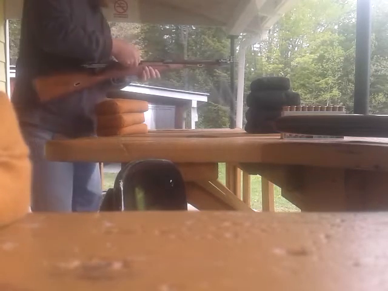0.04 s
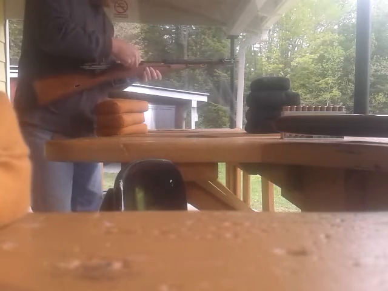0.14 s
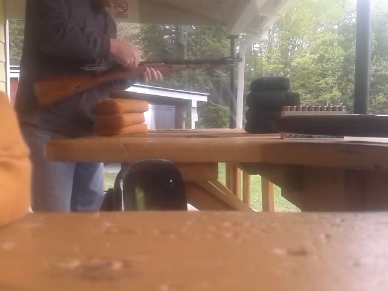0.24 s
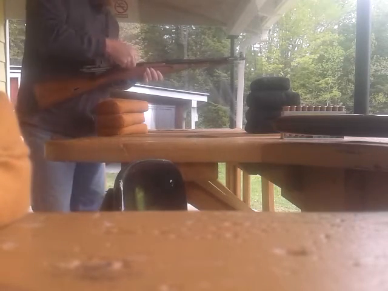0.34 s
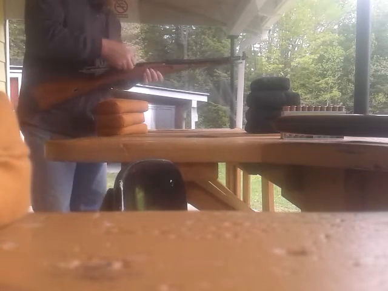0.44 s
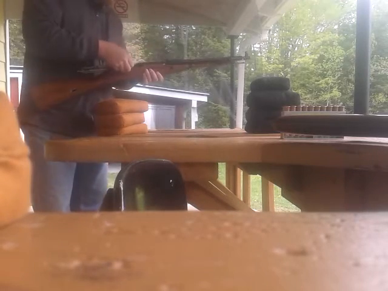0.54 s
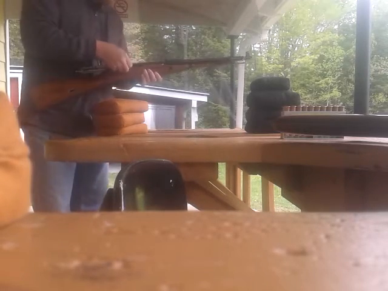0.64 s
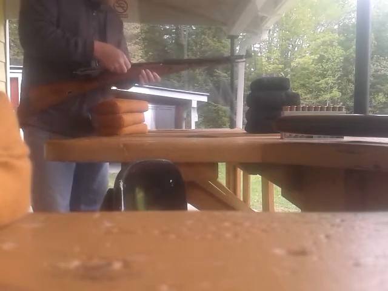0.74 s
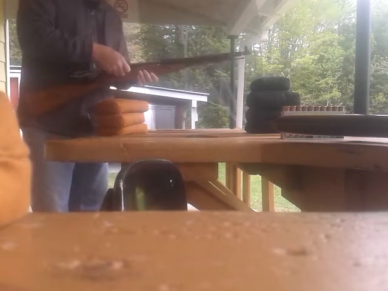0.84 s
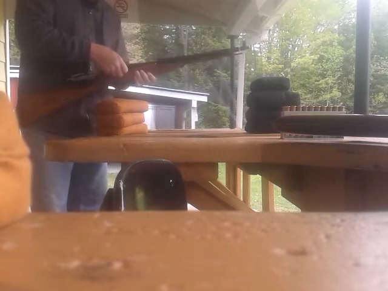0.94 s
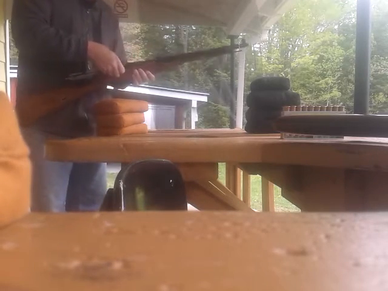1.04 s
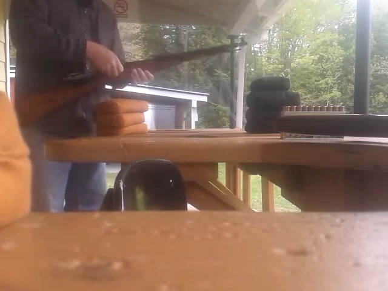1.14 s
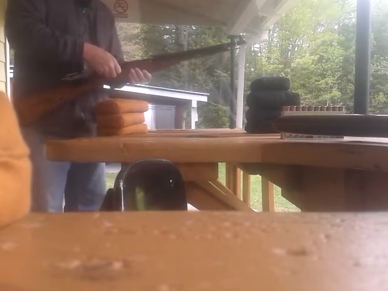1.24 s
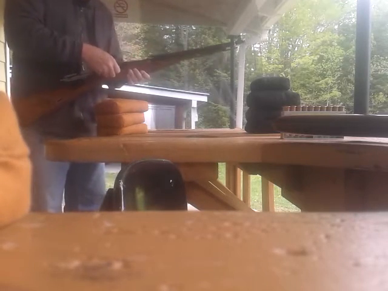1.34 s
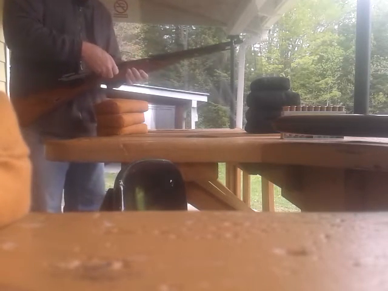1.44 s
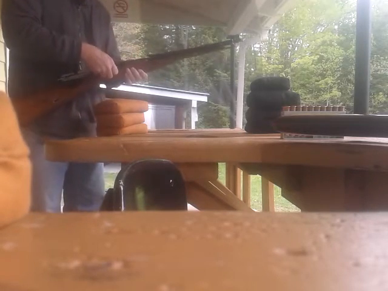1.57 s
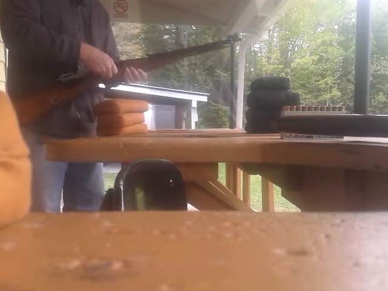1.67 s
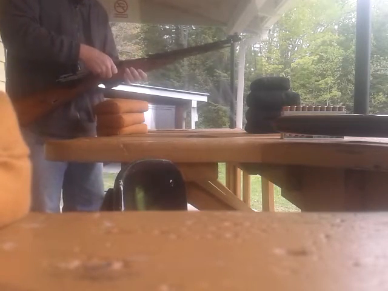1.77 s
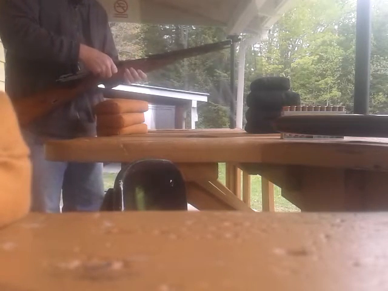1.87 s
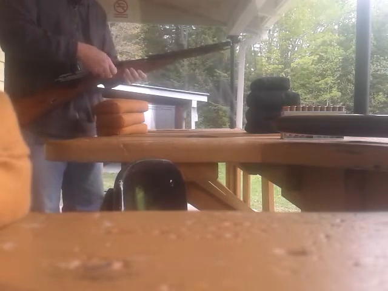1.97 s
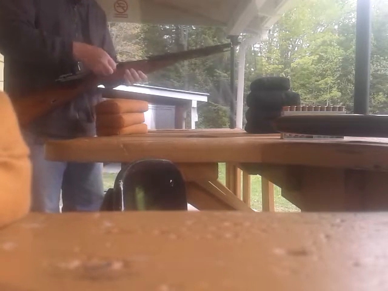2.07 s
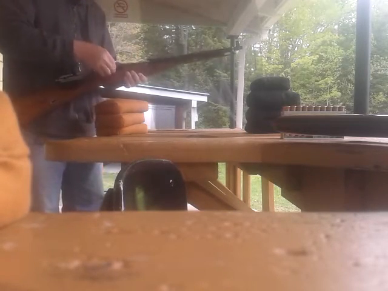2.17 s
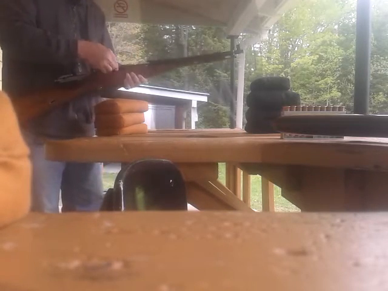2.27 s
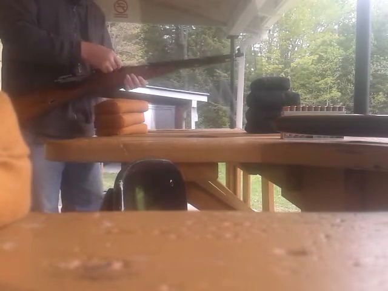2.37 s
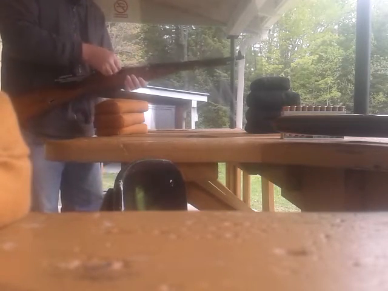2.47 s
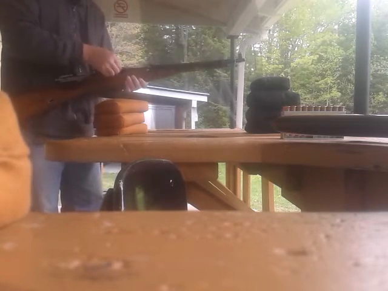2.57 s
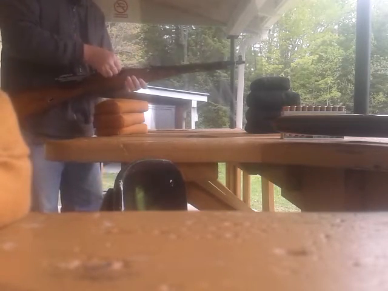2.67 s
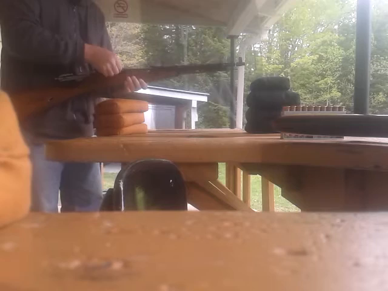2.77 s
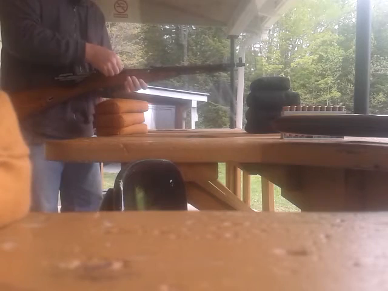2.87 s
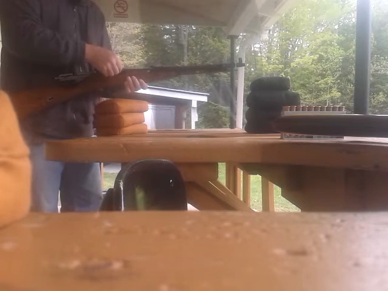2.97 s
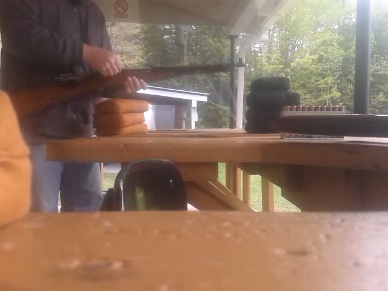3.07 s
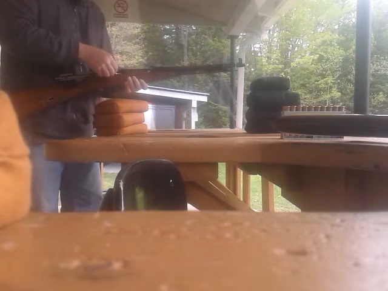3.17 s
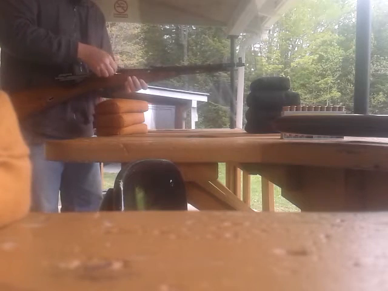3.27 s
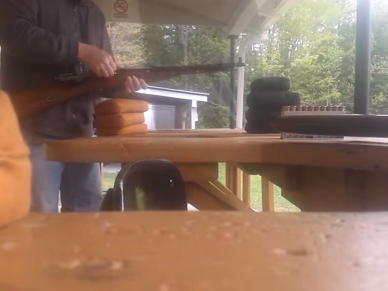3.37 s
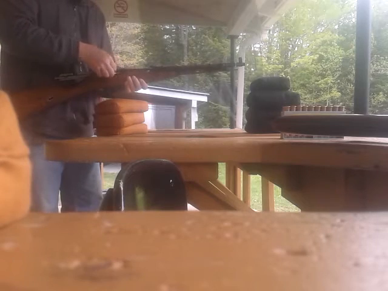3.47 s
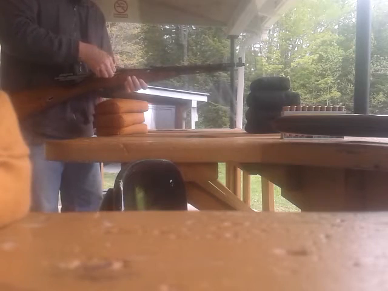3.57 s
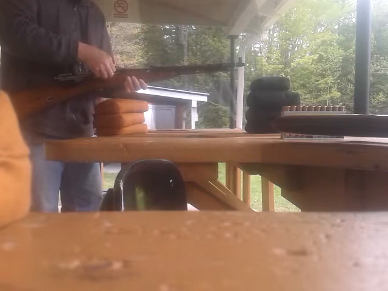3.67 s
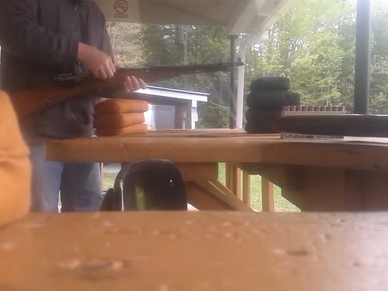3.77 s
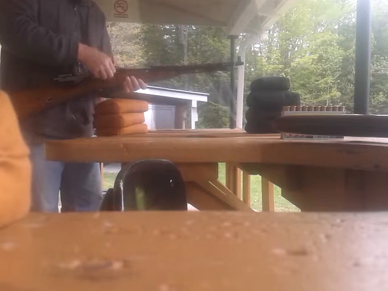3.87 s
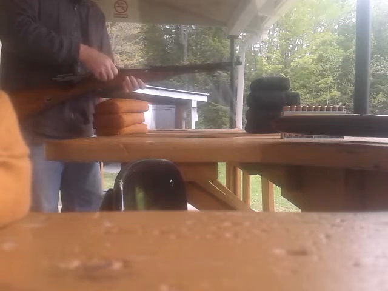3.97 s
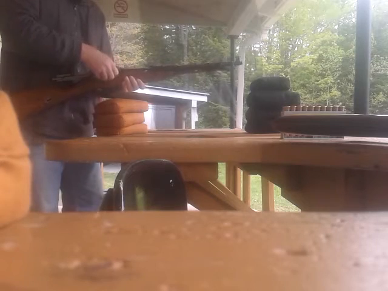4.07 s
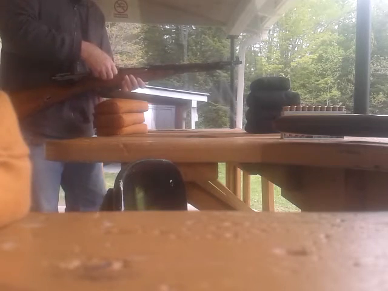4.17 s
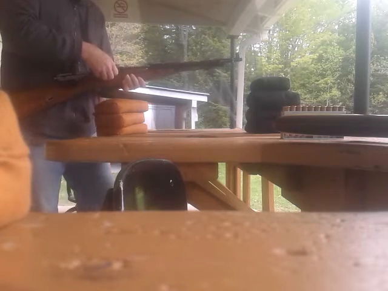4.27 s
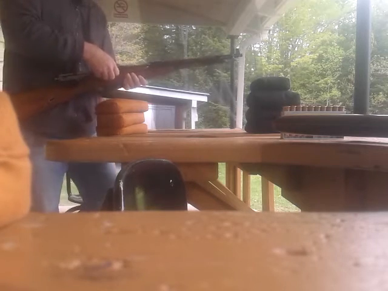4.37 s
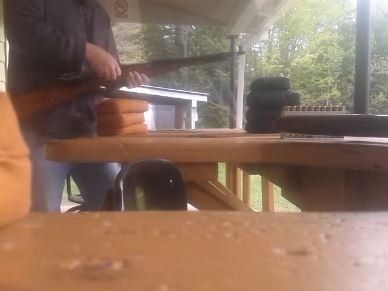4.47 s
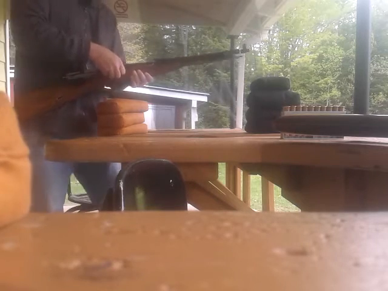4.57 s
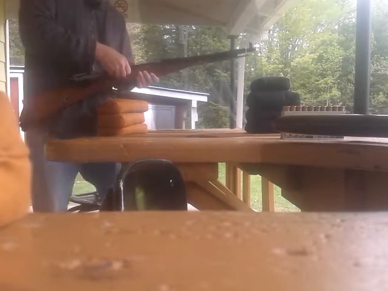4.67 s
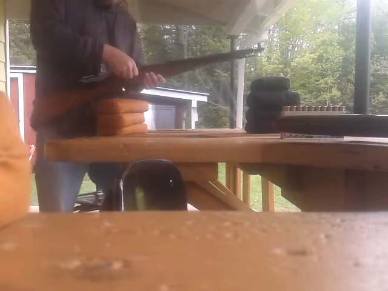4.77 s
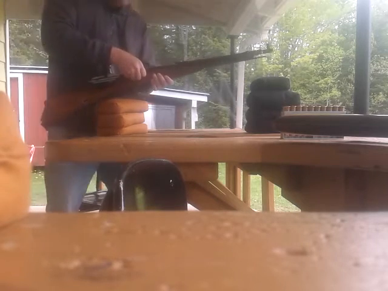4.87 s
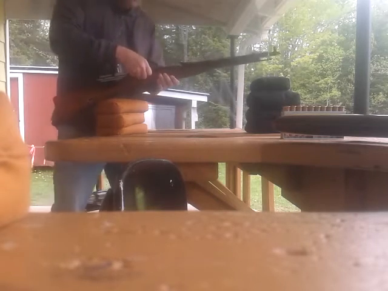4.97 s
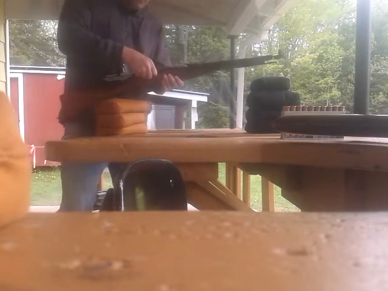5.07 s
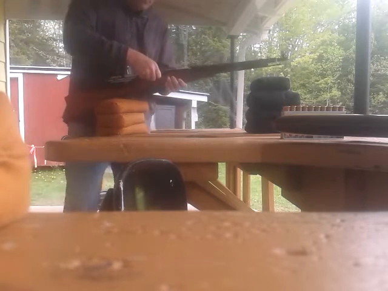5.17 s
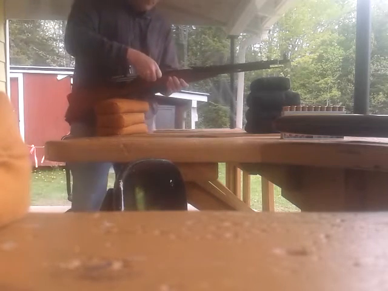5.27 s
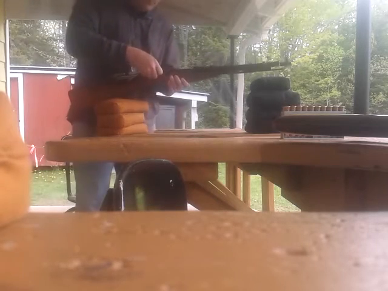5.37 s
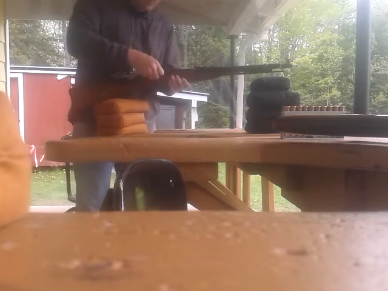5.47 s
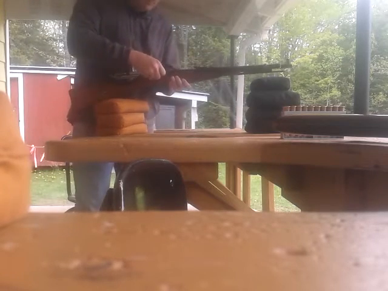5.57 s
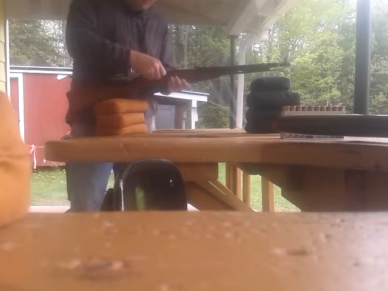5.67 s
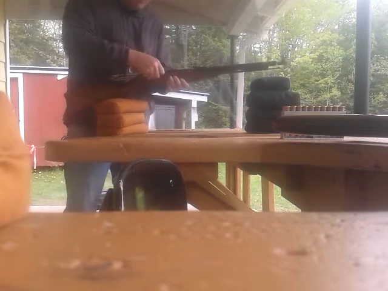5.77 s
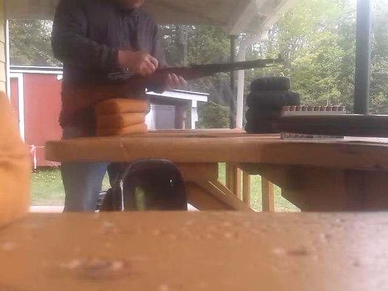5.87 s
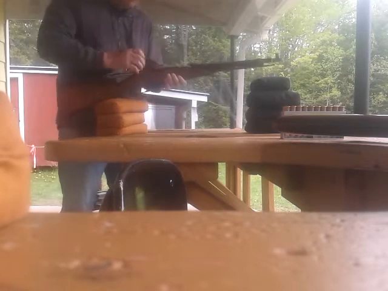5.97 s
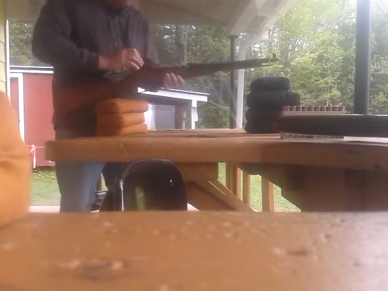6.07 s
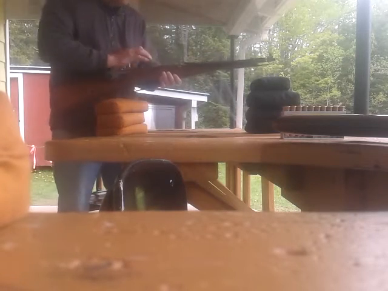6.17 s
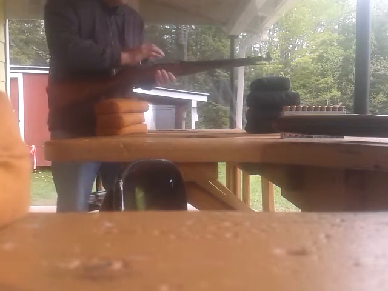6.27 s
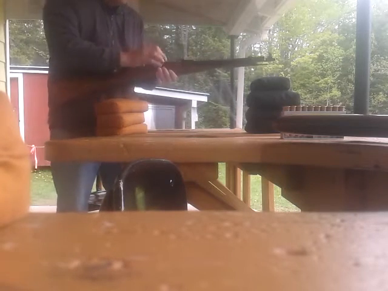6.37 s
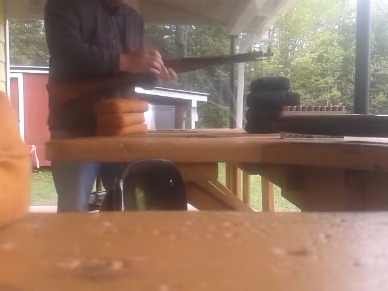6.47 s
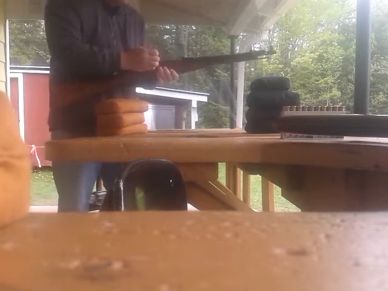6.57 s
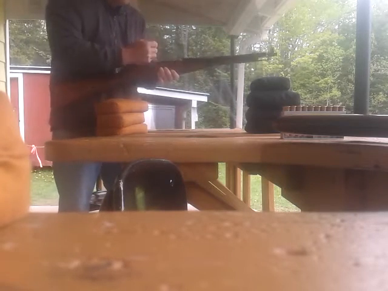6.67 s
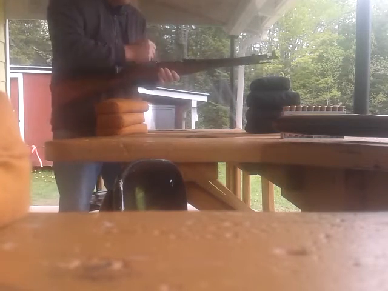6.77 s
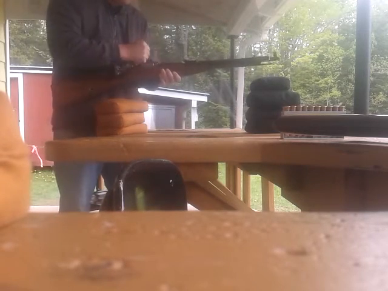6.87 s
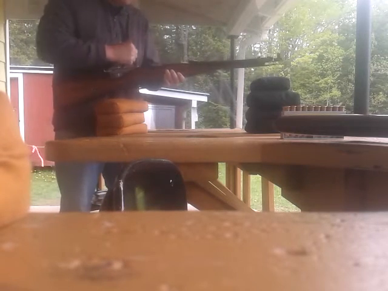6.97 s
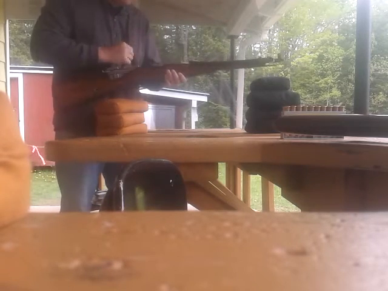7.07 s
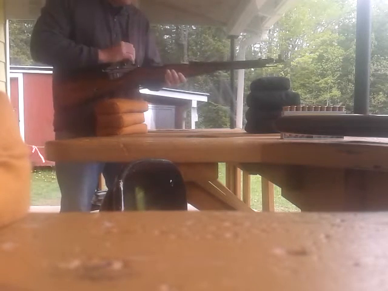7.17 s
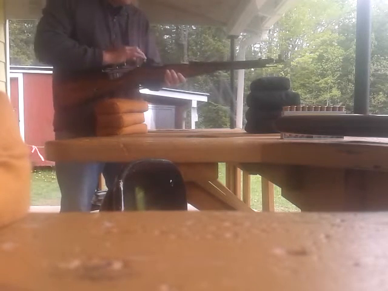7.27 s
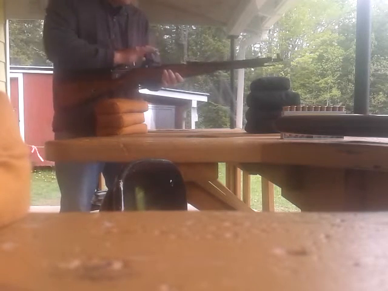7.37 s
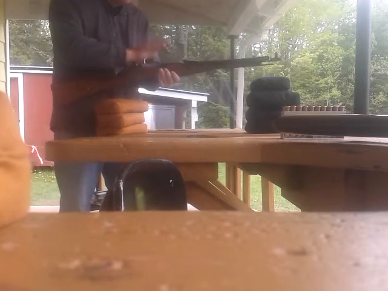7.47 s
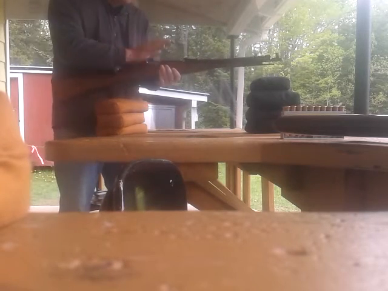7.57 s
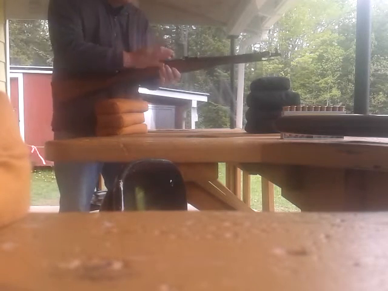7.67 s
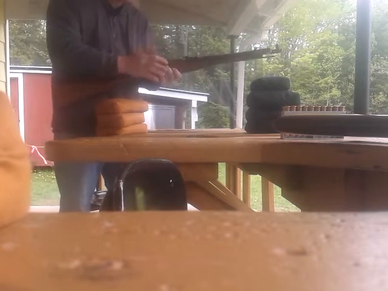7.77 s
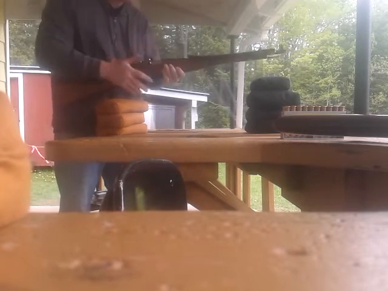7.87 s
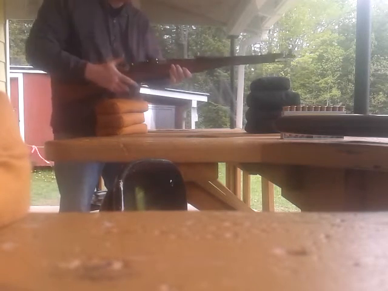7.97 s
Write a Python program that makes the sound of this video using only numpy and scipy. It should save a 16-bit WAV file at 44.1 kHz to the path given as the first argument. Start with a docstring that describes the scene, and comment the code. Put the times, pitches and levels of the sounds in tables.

```python
"""Over a faint outdoor hiss, small steel parts scrape, click and ping at a rifle's open action.
A man handles it for six seconds under the wooden roof of a range shelter; far birds whistle and
the floor bumps as he shifts his weight. Then he works the bolt in seven strokes, each a take-up,
a slide, a catch and a slam. The stock knocks, barrel and receiver ring, bench and roof throw
each blow back, and the slams overload the microphone two metres away."""
import sys
import numpy as np
from scipy import signal
from scipy.fft import rfft, irfft
from scipy.io import wavfile
from scipy.ndimage import uniform_filter1d

SR = 44100
rng = np.random.default_rng(int(sys.argv[2]) if len(sys.argv) > 2 else 0)


def dump(signal):
    """Clip the signal to [-1, 1] and save it as 16-bit WAV at the path in sys.argv[1]."""
    limited = np.clip(np.atleast_2d(signal).T, -1, 1)
    pcm = np.round(limited * 32767).astype(np.int16)
    wavfile.write(sys.argv[1], SR, pcm)


N = 353682


def amp(db):
    """Decibels to gain."""
    return 10 ** (np.asarray(db) / 20)


def unit(x):
    """Scales to energy 1."""
    return x / np.sqrt(np.sum(x ** 2) + 1e-20)


def curve_at(points, hz):
    """Interpolates on a log-frequency axis."""
    point_hz, value = np.transpose(points)
    return np.interp(np.log(hz + 1), np.log(point_hz + 1), value)


def hump(hz, centre_hz, octaves):
    """Bell of height 1 on the pitch axis."""
    return np.exp(-(np.log2(hz / centre_hz) / octaves) ** 2 / 2)


def clock(length_s):
    """Sample times in seconds."""
    return np.arange(int(length_s * SR)) / SR


def add(mix, start_s, sound):
    """Mixes a sound in at start_s."""
    part = mix[max(round(start_s * SR), 0):][:len(sound)]
    part += sound[:len(part)]


# Hiss spectrum. Each row: frequency in Hz, relative density in dB.
AIR_SPECTRUM = [(20, -17), (50, -24), (110, -15), (280, -3), (560, 1), (1000, -1.5), (1800, -5),
                (2500, -4.5), (3500, -2), (5300, -6), (6200, -19), (12000, -18.5), (16000, -16)]
# Hiss envelope. Each row: time in seconds, level in dB.
AIR_LEVELS = [(0, -51.5), (.3, -56.5), (1.1, -54.5), (2.4, -59), (3.6, -56), (4.7, -55.5), (5.7, -57.5),
              (7.3, -55), (8, -56.5)]


def air():
    """Trees, open air and microphone hiss quietly; the level drifts."""
    gain = amp(curve_at(AIR_SPECTRUM, np.fft.rfftfreq(N, 1 / SR)))
    hiss = irfft(rfft(rng.standard_normal(N)) * gain, N)
    level_db = np.interp(np.arange(N) / SR, *np.transpose(AIR_LEVELS))
    return unit(hiss) * np.sqrt(N) * amp(level_db)


def body(spectrum, knock_db, edge_db, part_hz, part_db, knock_hz=1110, edge_hz=7400, size=2048):
    """Response to one tap: the stock knocks, the struck part sings, a hard contact adds treble."""
    hz = abs(np.fft.fftfreq(size, 1 / SR)) + 1
    db = curve_at(spectrum, hz) + knock_db * hump(hz, knock_hz, octaves=0.38)
    db += part_db * hump(hz, part_hz, octaves=0.09)
    db += edge_db / (1 + (edge_hz / hz) ** 8)
    minimum_phase = np.exp(np.conj(signal.hilbert(np.log(amp(db)))))
    return unit(np.fft.ifft(minimum_phase).real[:size // 2])


# Shelter decay. Each row: frequency in Hz, t60 in seconds.
SHELTER_T60 = [(300, 0.19), (900, 0.23), (2500, 0.18), (5500, 0.14), (12000, 0.18)]


def shelter(direct_db, early_s=.0225, tail_db=-4.0, yard_db=-25, yard_t60_s=0.54):
    """Sound paths: direct, a dense cluster off bench and roof, the tail, the yard beyond."""
    t = clock(.6)
    taps, diffuse, chance = rng.standard_normal((3, len(t)))
    cluster = unit(taps * (chance > 1) * (t > .001) * (t < early_s))
    hz, frame_s, frames = signal.stft(diffuse, SR, nperseg=128)
    age_s = np.maximum(frame_s - early_s, 0)
    shelter_decay = amp(tail_db - 60 * age_s / curve_at(SHELTER_T60, hz)[:, None])
    yard_decay = amp(yard_db - 60 * age_s / yard_t60_s)
    tail = signal.istft(frames * np.hypot(shelter_decay, yard_decay), SR, nperseg=128)[1][:len(t)]
    paths = cluster + tail * (t >= early_s) / np.sqrt(early_s * SR)
    paths[0] += amp(direct_db)
    return paths


# Barrel and receiver modes. Each row: frequency in Hz, relative level in dB, t60 in seconds.
BARREL_MODES = [(1077, 7, 0.21), (1842, 3, 0.29), (2280, -10.5, 0.14), (2440, -7, 0.12), (3040, 4.5, .16),
                (3090, 11.5, 0.17), (3730, -4, 0.13), (3960, 3.5, .16), (4420, -2, 0.14), (4600, 4, .16),
                (5100, -7, 0.15), (5280, 14, 0.14), (5230, -8, .14)]


def ring(modes=BARREL_MODES):
    """Damped steel modes; every blow lands elsewhere and weights them anew."""
    t = clock(.4)
    draws = rng.random((len(modes), 2))
    weights = (.5 + draws[:, 0]) * np.sign(draws[:, 1] - .5)
    return unit(sum(weight * amp(db - 60 * t / t60_s) * np.cos(2 * np.pi * hz * t)
                    for (hz, db, t60_s), weight in zip(modes, weights)))


# Spectrum of the bolt and all sliding steel. Each row: frequency in Hz, relative density in dB.
STEEL_SPECTRUM = [(100, -46.5), (330, -24), (520, -16.5), (640, -8.5), (1100, -1.5), (1600, -6), (2400, 0),
                  (3200, 1), (4100, -3), (4600, 0), (5500, 0.5), (6200, -7.5), (9500, -19.5), (15500, -29)]


def slide(length_s, knock_db, edge_db, swell_db, slips_per_s=900, spread_db=4):
    """Sliding steel catches in tiny slips that grow as the hand speeds up."""
    t = clock(np.clip(length_s, .004, .24))
    chance, size, polarity = rng.random((3, SR // 4))[:, :len(t)]
    slip_db = spread_db * np.minimum(-np.log(size + 1e-9), 3)
    slips = (chance < slips_per_s / SR) * amp(slip_db) * np.sign(polarity - .5)
    friction = (slips + 0.25 * (polarity - .5)) * amp(swell_db * t / t[-1])
    response = body(STEEL_SPECTRUM, knock_db, edge_db, part_hz=4860, part_db=-2)
    rubbed = signal.fftconvolve(friction, response)
    sound = unit(signal.fftconvolve(rubbed, shelter(direct_db=-6.0)))
    add(sound, 0, amp(-18.0) * unit(signal.fftconvolve(friction, ring())))
    return np.sqrt(len(t)) * sound


def blow(response, paths, ring_db, chatter_s, chatter_gain=0.13):
    """One impact: the parts chatter for an instant, the rifle rings, the shelter answers."""
    t = clock(.015)
    force = rng.standard_normal(len(t)) * np.exp(-t / chatter_s) * chatter_gain
    force[0] = 1
    sound = unit(signal.fftconvolve(np.convolve(force, response), paths))
    add(sound, 0, amp(ring_db) * ring())
    return sound * np.sqrt(SR / 50)  # energy of about 20 ms at rms 1


# Spectrum of a light contact. Each row: frequency in Hz, relative density in dB.
TICK_SPECTRUM = [(100, -59), (350, -31), (600, -22), (760, -7.5), (960, -1), (1130, 7.5), (1380, -1),
                 (1750, -6), (2500, -0.5), (3750, -2.5), (5200, -1), (6200, -11), (10000, -26.5),
                 (15500, -41.5)]


def tick(knock_db, edge_db, part_hz):
    """One small part strikes the receiver."""
    response = body(TICK_SPECTRUM, knock_db, edge_db, part_hz, part_db=7.5)
    return blow(response, shelter(direct_db=-6.5, early_s=.021), ring_db=-13.5, chatter_s=0.00062)


SCRAPE_S = 0.017


def contact(knock_db, edge_db, part_hz, rebound_s=.010, rebound_db=-11.5):
    """A part scrapes, ticks and rebounds once; more pressure on the stock scrapes louder."""
    scrape_db = -13.5 + 0.18 * knock_db
    sound = amp(scrape_db) * slide(SCRAPE_S, knock_db=7.5, edge_db=-6.5, swell_db=12)
    add(sound, SCRAPE_S, tick(knock_db, edge_db, part_hz))
    landing_s = SCRAPE_S + rebound_s * (.5 + rng.random())
    add(sound, landing_s, amp(rebound_db) * tick(knock_db, edge_db, part_hz))
    return sound * amp(-3.0)


# Light contacts. Each row: impact in seconds, relative level in dB, stock knock in dB,
# treble edge in dB, part pitch in Hz.
CLICK_EVENTS = [(0.169, -38.5, -10, -2, 2570), (0.237, -40, -14, -27, 2680), (0.459, -25, -11, -12, 2640),
                (0.57, -36, 2.5, 0, 2680), (0.654, -43, -6, 6, 2650), (0.782, -24, -13, -7.5, 2750),
                (1.026, -26, 3, -9, 3000), (1.144, -33, -2, -20, 3100), (1.197, -25.5, 9, 6, 4930),
                (1.222, -19.5, -3.5, 8.5, 4920), (1.579, -14, -4, 6, 2710), (1.654, -28, -8, 5, 5300),
                (1.7263, -25.5, -13, -4.5, 4900), (1.983, -25, -2, 8, 2740), (2.124, -42, 6, -16, 2830),
                (2.48, -40, -4, 8, 4500), (2.511, -31.5, -12, 1, 4670), (2.598, -33.5, -2.5, 6, 2300),
                (2.64, -31, -11, 4, 2740), (2.688, -25.5, -11, -5, 2800), (2.75, -41.5, -8, 8, 2650),
                (2.958, -40.5, -9, -11, 2600), (3.223, -36.5, -11, -9, 2800), (3.661, -44.5, -11, -7, 2950),
                (3.711, -42, -21, 7, 2600), (3.826, -22, -2.5, 3.5, 2430), (3.948, -31, 10, -8, 2930),
                (3.991, -23.5, -4, 5, 5400), (4.164, -22, 1.5, 8.5, 2950), (4.2335, -15.5, -14, 2, 2600),
                (4.3074, -12.5, -13, -1, 3100), (4.564, -30.5, -8, 1, 2950), (4.866, -34, 9, -6, 3080),
                (4.9577, -22, 12, -3, 2900), (4.967, -21, 8, 3, 4550), (5.009, -30, -4, 6, 2750),
                (5.0726, -27.5, 1.5, -5, 2940), (5.127, -28.5, 9, -6, 2800), (5.256, -26.5, 2, -2.5, 2980),
                (5.638, -36, 2, -3, 1500), (5.679, -39, 4.5, 5, 5050), (5.839, -34, 2, 2, 1400),
                (6.039, -47.5, 0, -11, 2600)]


def clicks():
    """Small parts touch down at the open action."""
    out = np.zeros(N)
    for impact_s, db, knock_db, edge_db, part_hz in CLICK_EVENTS:
        add(out, impact_s - SCRAPE_S, amp(db) * contact(knock_db, edge_db, part_hz))
    return out


# Whistles. Each row: start and length in seconds, first and last pitch in Hz, level in dB.
BIRD_NOTES = [(.24, 0.13, 5300, 4900, -67), (1.89, 0.086, 2850, 2700, -63), (5.472, .18, 3450, 4100, -63.5)]


def birds(waver_hz=170):
    """Birds whistle thin glides, blurred by distance."""
    out = np.zeros(N)
    for start_s, length_s, first_hz, last_hz, db in BIRD_NOTES:
        n = int(length_s * SR)
        waver = np.sqrt(n) * unit(uniform_filter1d(rng.standard_normal(n), size=60))
        hz = np.linspace(first_hz, last_hz, n) + waver_hz * waver
        note = np.sin(2 * np.pi * np.cumsum(hz) / SR) * signal.windows.tukey(n, .5)
        blurred = unit(signal.fftconvolve(note, shelter(direct_db=-1)))
        add(out, start_s, amp(db) * np.sqrt(n) * blurred)
    return out


# Thin steel modes. Each row: frequency in Hz, relative level in dB, t60 in seconds.
PING_MODES = [(5810, -18.5, 0.041), (5640, -15.5, 0.015), (12900, -40, 0.0077), (15500, -40, .008)]
# Flicks. Each row: impact in seconds, relative level in dB, stock knock in dB, ping re contact in dB.
PING_EVENTS = [(0.423, -30.5, -3, -3), (3.075, -31, -3, 3), (3.1118, -34.5, -9, 0), (3.236, -33, -1, -7.5),
               (3.292, -34, 0, -4.5), (3.4, -27, -1.5, -4), (3.458, -37, 3, -3), (3.587, -28.5, 8, -5.5)]


def pings():
    """A flick sets a thin, springy piece of steel ringing."""
    out = np.zeros(N)
    for impact_s, db, knock_db, ping_db in PING_EVENTS:
        sound = contact(knock_db, edge_db=1.5, part_hz=2780)
        ping = unit(signal.fftconvolve(ring(PING_MODES), shelter(direct_db=-4.0)))
        add(sound, SCRAPE_S, amp(ping_db) * np.linalg.norm(sound) * ping)
        add(out, impact_s - SCRAPE_S, amp(db) * sound)
    return out


# Parts rubbed under pressure. Each row: start and end in seconds, level in dB.
RUB_EVENTS = [(1.428, 1.475, -38), (4.13, 4.156, -38.5), (4.504, 4.529, -48), (5.763, 5.794, -38.5),
              (5.812, 5.838, -39.5)]


def rubs():
    """Pressed hard, sliding steel makes the stock drone."""
    out = np.zeros(N)
    for start_s, end_s, db in RUB_EVENTS:
        add(out, start_s, amp(db) * slide(end_s - start_s, knock_db=13, edge_db=-4.5, swell_db=8))
    return out


# Floor bumps. Each row: start in seconds, level in dB, pitch in Hz.
BUMP_EVENTS = [(4.665, -47, 430), (5.26, -48, 405)]


def bumps(t60_s=0.17):
    """The floor gives a dull, hollow bump as the man shifts his weight."""
    out, t = np.zeros(N), clock(.3)
    for start_s, db, hz in BUMP_EVENTS:
        push = rng.standard_normal(len(t)) * amp(-60 * t / t60_s)
        thud = signal.lfilter(*signal.butter(2, [hz * 0.85, hz * 1.55], "band", fs=SR), push)
        add(out, start_s, amp(db) * unit(thud) * np.sqrt(SR / 50))
    return out


def clack(knock_db, edge_db, part_hz, chatter_s):
    """The heavy bolt strikes the receiver."""
    response = body(STEEL_SPECTRUM, knock_db, edge_db, part_hz, part_db=5.5)
    paths = shelter(direct_db=-5.5, early_s=.019, tail_db=-5.5)
    return blow(response, paths, ring_db=-18, chatter_s=chatter_s) * amp(-2.3)


# Bolt strokes. Each row: grip, catch and slam times in seconds; relative take-up, catch, drag and
# slam levels in dB; stock knock in dB; part pitch in Hz.
BOLT_STROKES = [(6.169, 6.282, 6.3288, -32, -14, -26, -6, -2, 4650),
                (6.41, 6.425, 6.4397, -34, -26, -24, -8, 1, 1800),
                (6.695, 6.722, 6.735, -31, -26, -20, -5.2, 0, 4000),
                (6.905, 6.944, 6.9762, -22.5, -17.5, -27, -8, -2.5, 3020),
                (7.005, 7.026, 7.049, -33, -10, -18, -13, 4, 5350),
                (7.337, 7.4241, 7.4885, -30, -19, -14, -5.8, -1, 2500),
                (7.596, 7.615, 7.633, -26.5, -15, -22.5, -4.5, -1, 1860)]


def bolt(run_up_db_per_s=83, kick_s=.006, kick_db=-6.5):
    """The hand takes up slack; the bolt slides, catches, drags, slams, kicks back and lands again."""
    out = np.zeros(N)
    for grip_s, catch_s, slam_s, take_up_db, catch_db, drag_db, slam_db, knock_db, hz in BOLT_STROKES:
        run_up_s = catch_s - grip_s
        run_up_db = -37 + run_up_db_per_s * run_up_s  # longer run-up: faster, louder
        add(out, grip_s, amp(take_up_db) * clack(knock_db=2, edge_db=-2.5, part_hz=4860, chatter_s=.004))
        add(out, grip_s, amp(run_up_db) * slide(run_up_s, knock_db=3, edge_db=-5, swell_db=30))
        add(out, catch_s, amp(catch_db) * clack(knock_db + 3, edge_db=-3, part_hz=5050, chatter_s=.003))
        add(out, catch_s, amp(drag_db) * slide(slam_s - catch_s, knock_db + 1, edge_db=-3, swell_db=3.5))
        add(out, slam_s, amp(slam_db) * clack(knock_db, edge_db=3, part_hz=hz, chatter_s=.0012))
        kick = clack(knock_db, edge_db=3, part_hz=4700, chatter_s=.002)
        add(out, slam_s + kick_s, amp(slam_db + kick_db) * kick)
    return out


def scene():
    """Air, rifle, floor and birds in mono."""
    return (air() + clicks() + pings() + rubs() + bolt() + bumps() + birds())[None]


def record(dry, ceiling=.76, low_cut_hz=30, high_cut_hz=15950):
    """The microphone rounds off the loudest peaks, thins the deep bass and cuts the top treble."""
    squashed = dry / (1 + (dry / ceiling) ** 6) ** (1 / 6)
    thinned = signal.lfilter(*signal.butter(1, low_cut_hz, "high", fs=SR), squashed)
    lowpass = signal.firwin(511, high_cut_hz, window=("kaiser", 9), fs=SR)
    return signal.oaconvolve(thinned, lowpass[None], "same")


dry = scene()
out = record(dry)
dump(out)
```